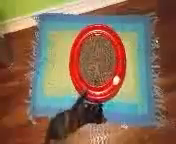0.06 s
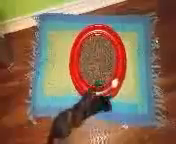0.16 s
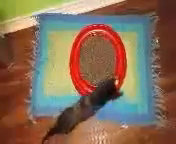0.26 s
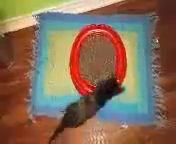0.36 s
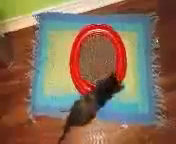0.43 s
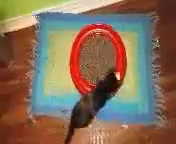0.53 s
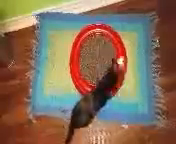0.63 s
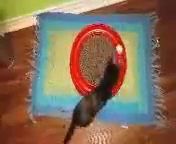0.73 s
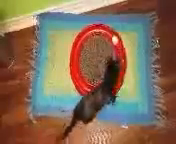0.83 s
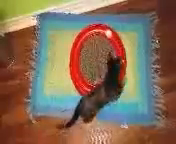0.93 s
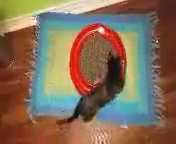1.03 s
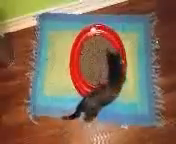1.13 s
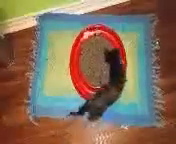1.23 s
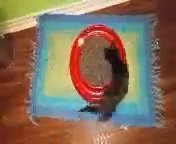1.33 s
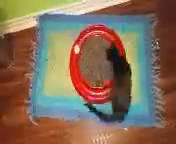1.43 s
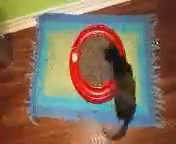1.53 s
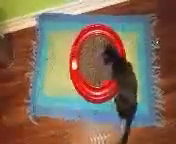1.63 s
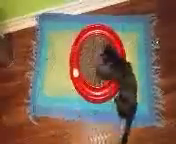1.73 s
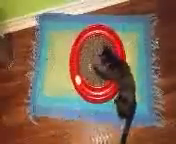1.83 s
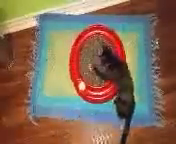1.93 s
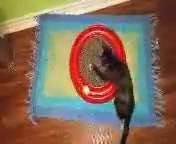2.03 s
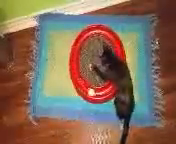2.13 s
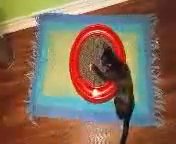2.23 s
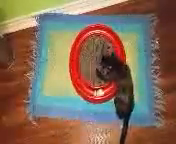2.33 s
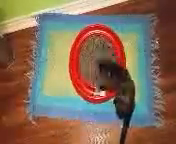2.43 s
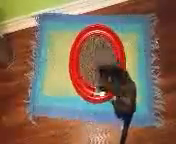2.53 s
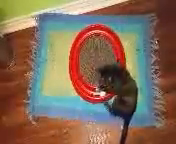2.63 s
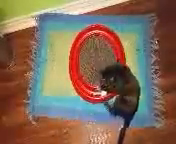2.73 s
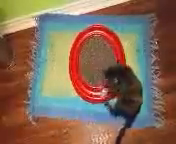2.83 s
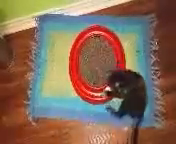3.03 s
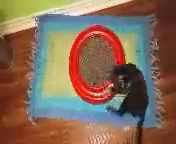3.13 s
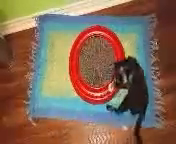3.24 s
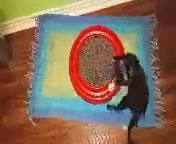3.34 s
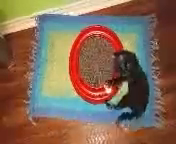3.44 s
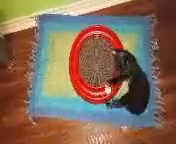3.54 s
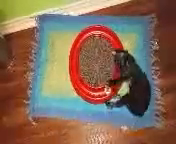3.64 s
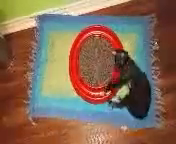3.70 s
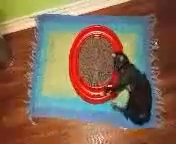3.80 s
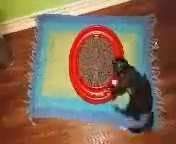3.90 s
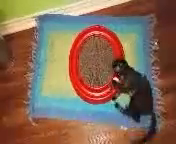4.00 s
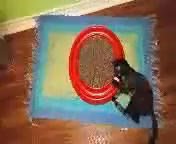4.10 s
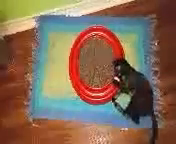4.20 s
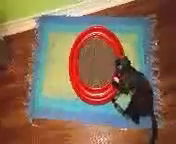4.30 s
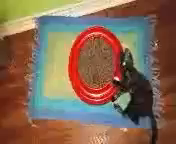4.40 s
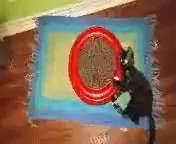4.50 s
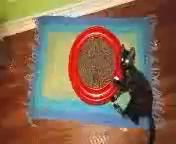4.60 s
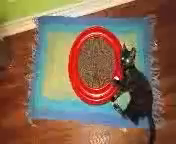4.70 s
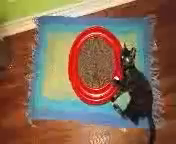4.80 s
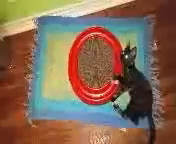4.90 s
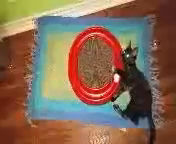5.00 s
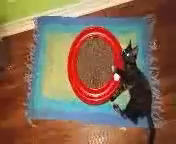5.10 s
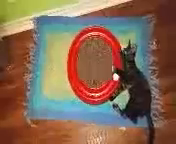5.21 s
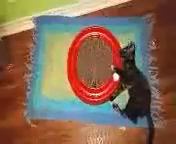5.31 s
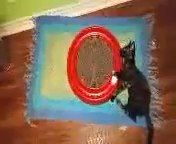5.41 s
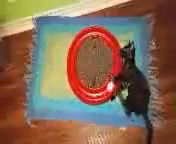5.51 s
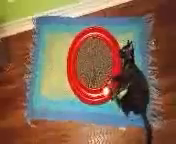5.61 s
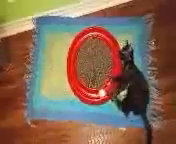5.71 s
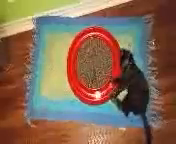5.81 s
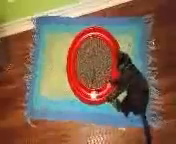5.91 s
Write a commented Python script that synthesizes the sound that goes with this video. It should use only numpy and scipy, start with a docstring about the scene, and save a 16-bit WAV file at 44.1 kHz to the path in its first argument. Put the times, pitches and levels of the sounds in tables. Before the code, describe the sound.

In a quiet room, a cat's paw knocks a hollow plastic track with quick, dull booms, loudest before one second. The ball rolls with a low rattling drone until about 2.5 seconds, amid more blows. Then come isolated thuds, brief rolls and long pauses. A hand-held stereo microphone close by picks up low finger bumps and faint hiss on the left.

```python
"""Cat playing with a ring-track toy

A cat bats a ball round a hollow plastic ring track on a rug, in a quiet room, near a hand-held camera.
Noise-like taps drive decaying track and wall modes: a drone as the ball rolls, a boom at each paw blow.
Low decaying swings give the paw thuds and the finger bumps on the camera; filtered grit gives claw scrapes.
Sparse echoes add the room; a hiss band in the left microphone and a low noise floor lie beneath.
"""
import sys
import numpy as np
from scipy import signal
from scipy.fft import rfft, irfft
from scipy.io import wavfile
from scipy.ndimage import uniform_filter1d

SR = 44100
rng = np.random.default_rng(int(sys.argv[2]) if len(sys.argv) > 2 else 0)


def amp(db):
    return 10 ** (np.asarray(db, float) / 20)


def write(x):
    x = np.atleast_2d(x).T
    wavfile.write(sys.argv[1], SR, np.round(np.clip(x, -1, 1) * 32767).astype(np.int16))


N = 262395
TIME = np.arange(N) / SR


def evened(x):
    """Scales to rms 1."""
    return x / np.sqrt(np.mean(x ** 2) + 1e-30)


def read(points, hz):
    """Interpolates every column of a table on a log-frequency axis."""
    f, *columns = np.transpose(points)
    return [np.interp(np.log(hz + 1), np.log(f + 1), c) for c in columns]


def follow(spans):
    """Soft gate open only within the curves' spans, then every column at every sample."""
    s, *columns = np.transpose(np.concatenate(spans))
    is_open = sum((TIME >= rows[0][0]) & (TIME <= rows[-1][0]) for rows in spans)
    gate = uniform_filter1d(is_open * 1., 600)
    return gate, *[np.interp(TIME, s, c) for c in columns]


def colour(x, points):
    """Filters by a spectrum in dB."""
    count = x.shape[-1]
    gain_db = read(points, np.fft.rfftfreq(count, 1 / SR))[0]
    return irfft(rfft(x) * amp(gain_db), count)


def add(mix, s, sound):
    """Mixes a sound in at a time."""
    part = mix[..., max(round(s * SR), 0):][..., :sound.shape[-1]]
    part += sound[..., :part.shape[-1]]


def ring(modes, weight=1, detune=1):
    """Impulse response of each mode, total energy 1; soft contacts leave little outside the modes' range."""
    hz, db, t60 = np.transpose(modes)[:, :, None]
    t = np.arange(SR // 2) / SR
    decay = amp(db - 60 * t / t60) / np.sqrt(t60)
    out = weight * decay * np.sin(2 * np.pi * hz * detune * t)
    band_hz = [1.178 * hz.min(), 1.12 * hz.max()]
    out = signal.sosfilt(signal.butter(3, band_hz, "band", fs=SR, output="sos"), out)
    return out / np.linalg.norm(out)


def grit(count, per_s, spread_db):
    """Sparse small impacts of random sign, a few of them large; rms 1."""
    chance, size, sign = rng.random(count), rng.exponential(1, count), rng.standard_normal(count)
    return evened((chance < per_s / SR) * np.sign(sign) * amp(spread_db * np.minimum(size, 4)))


def swing(db, hz, t60, rise_s, lead_rad=0):
    """A few low swings that start fast and die without ringing."""
    t = np.arange(SR // 8) / SR
    onset = 1 - np.exp(-(t / rise_s) ** 2)
    return onset * amp(db - 60 * (t / t60) ** 1.325) * np.sin(2 * np.pi * hz * t + lead_rad)


# track ring modes, almost evenly spaced: (frequency [Hz], relative level [dB], t60 [s])
TRACK_MODES = [(115, -20, .08), (145, -17, .09), (175, -7, .16), (460, -13, .1), (493, -11, .15),
               (572, -12, .17), (630, -15, .13), (700, -17, .12), (757, -19, .15), (231, -2, .16),
               (236, -5, .65), (268, -12, .12), (304, -3, .2), (356, 0, .24), (414, -4, .17)]


def favour(favoured_hz):
    """Mode gains: the place of contact drives the track modes near one frequency most."""
    mode_hz = np.transpose(TRACK_MODES)[0][:, None]
    return 0.43 + np.exp(-(np.log(mode_hz / favoured_hz) / 0.3) ** 2)


# wall modes that only hard contacts reach: (frequency [Hz], relative level [dB], t60 [s])
WALL_MODES = [(712, 9, 0.03), (924.4, 3, 0.095), (1086, 2, 0.06), (1178, -16, 0.11), (1394, -2, 0.047),
              (1520, -4, 0.03), (1744, -8, 0.026), (1757, -18, 0.072), (2223, -17, 0.027),
              (2570, -21, 0.022)]


def wall_patch():
    """Impulse response of one stretch of wall; each has its modes at slightly other frequencies."""
    return ring(WALL_MODES, detune=1 + 0.073 * rng.standard_normal((len(WALL_MODES), 1))).sum(0)


# rolling ball, one list a run: (time [s], drone drive level [dB])
ROLL_RUNS = [
    [(0.0, -44), (0.224, -48.5), (0.5, -65)],
    [(0.74, -49), (0.89, -41.5), (1.65, -39), (1.87, -44.5), (2.14, -42.5), (2.42, -45), (2.47, -43),
     (2.58, -56.5), (2.77, -68.5), (3.02, -59)],
    [(3.3, -67), (3.522, -57.5), (3.606, -46), (3.73, -66.5), (3.95, -64), (4.01, -48), (4.11, -51.5),
     (4.15, -70.5)],
    [(5.46, -79), (5.56, -48), (5.686, -47.5), (5.95, -42.5)],
]


def rolling():
    """The ball's unevenness taps the track so often that the taps merge into a rumble; the wall rattles."""
    roll_hz = 328  # modes near here are driven most
    full_rattle_db, full_roll_db, rattle_slope = -66, -36, 0.47  # slope: rattle dB per drone dB
    gate, drone_db = follow(ROLL_RUNS)
    rattle_db = full_rattle_db + rattle_slope * (drone_db - full_roll_db)
    taps = gate * amp(drone_db) * grit(N, 600, 3.5) * favour(roll_hz)
    out = signal.oaconvolve(taps, ring(TRACK_MODES), axes=1).sum(0)[:N]
    ticks = gate * amp(rattle_db) * grit(N, 1500, 1.3)
    patch = (TIME / .09).astype(int) % 8  # the ball passes from one stretch of wall to the next
    for k in range(8):
        out += signal.oaconvolve(ticks * (patch == k), wall_patch())[:N]
    return out


# paw blows: (time [s], boom peak [dB], favoured frequency [Hz], knock peak re boom [dB], rise [s])
PAW_BLOWS = [(0.026, -46.5, 230, -8, 0.0064), (0.212, -38, 414, -22.5, 0.008),
             (.328, -30, 374, -25.5, 0.0049), (.494, -38.5, 383, -27, 0.0059),
             (.535, -26, 370, -27.5, 0.0033), (0.563, -37, 340, -40, 0.0024),
             (0.625, -33, 420, -20, 0.0035), (0.727, -16, 436, -20, 0.0015),
             (.822, -23.5, 345, -23, 0.0036), (.85, -30.5, 362, -30, 0.0055),
             (.909, -33.5, 360, -5, 0.00086), (0.936, -30, 337, -29, 0.0023),
             (1.028, -29.5, 351, -17, 0.00096), (1.13, -29.5, 341, -17.5, 0.0014),
             (1.257, -26, 342, -25, 0.0057), (1.433, -34, 332, -17, 0.0043),
             (1.488, -34, 232, -14.5, 0.00092), (1.642, -28, 333, -14.5, 0.002),
             (1.85, -29, 313, -23.5, 0.0057), (2.03, -23.5, 388, -23, 0.0066),
             (2.053, -32.5, 360, -14, 0.0045), (2.263, -24.5, 342, -21.5, 0.0052),
             (2.477, -24.5, 238, -22, 0.0022), (2.493, -24.5, 250, -26.5, 0.0044),
             (2.529, -29, 223, -26, 0.014), (3.033, -37, 303, -27.5, 0.0047),
             (3.087, -50, 350, -19, 0.0089), (3.283, -39, 369, -31, 0.0016),
             (3.401, -31.5, 400, -21, 0.0017), (3.465, -44, 230, -28, 0.0056),
             (3.562, -31, 335, -25, 0.0024), (3.59, -46, 325, -29, 0.0067),
             (3.618, -23.5, 330, -36.5, 0.0017), (3.928, -28, 362, -19, 0.0017),
             (3.954, -33, 345, -45, 0.0025), (3.994, -34.5, 408, -42, 0.0051),
             (4.447, -51, 400, -19, 0.0066), (5.097, -38, 225, -40, 0.0027),
             (5.124, -31.5, 231, -30, 0.0065), (5.506, -43, 353, -41, 0.0016),
             (5.586, -34, 337, -49, 0.0027), (5.715, -41.5, 684, -9.5, 0.0019),
             (5.845, -35, 390, -43, 0.004)]


def blows():
    """A shudder of ball and track; the quicker the paw lands, the stronger the first contact."""
    shudder_s = 0.023  # decay constant of the chatter
    out, t = np.zeros(N), np.arange(SR // 5) / SR
    for s, boom_db, favoured_hz, hard_db, rise_s in PAW_BLOWS:
        onset = 1 - np.exp(-(t / max(rise_s, 3e-4)) ** 1.8)
        decay = np.exp(-(np.maximum(t - rise_s, 0) / shudder_s) ** 1.19)
        drive = onset * decay * grit(len(t), 900, 3.4)
        drive = drive / np.linalg.norm(drive)
        drive[0] = -1.1 * np.exp(-rise_s / 0.0034)  # first contact
        place = amp(rng.normal(0, 1.5, (len(TRACK_MODES), 1))) * favour(favoured_hz)
        boom = signal.fftconvolve(drive, ring(TRACK_MODES, place).sum(0))
        knock = signal.fftconvolve(drive * np.exp(-t / 0.033), wall_patch())
        blow = boom / abs(boom).max() + amp(hard_db) * knock / abs(knock).max()
        add(out, s, amp(boom_db) * blow)
    return out


# paw weight landing on the toy: (time [s], swing level [dB], frequency [Hz], t60 parameter [s])
PAW_THUDS = [(0.636, -33.5, 178, 0.041), (0.729, -30.5, 140.3, 0.09), (1.021, -39.5, 147, 0.14),
             (2.532, -32.5, 170, 0.14), (3.173, -41.5, 138, 0.085), (3.398, -32.5, 176, 0.075),
             (3.521, -37, 116, 0.052), (3.561, -33, 161, 0.073), (3.619, -14.5, 172, 0.024),
             (3.867, -43.5, 150, 0.075)]


def thuds():
    """The toy and the boards under the rug give one dull beat."""
    out = np.zeros(N)
    for s, db, hz, t60 in PAW_THUDS:
        add(out, s - .002, swing(db, hz, t60, 0.0026))
    return out


def stroke(s, db, hold_s, rise_db_per_s, fall_db_per_s):
    """Pressure that builds, holds and lets go."""
    build_db = abs(rise_db_per_s) * np.maximum(s - TIME, 0)
    release_db = abs(fall_db_per_s) * np.maximum(TIME - s - hold_s, 0)
    return amp(db - build_db - release_db)


# scrape spectrum: (frequency [Hz], relative level [dB])
SCRAPE_SPECTRUM = [(1500, -38), (3000, -17), (5200, -15.5), (7000, -24), (8200, -56), (9500, -20),
                   (11000, -12.5), (12300, 1), (13200, 3), (13700, -59)]
# claw snapping off an edge: (time [s], peak drive level [dB], t60 [s])
SNAP = (.9095, -40.5, 0.045)
# claws and fur on plastic: (full-pressure time [s], drive level [dB], hold [s], rise [dB/s], fall [dB/s])
CLAW_STROKES = [(0.315, -75, .025, 398, 300), (0.632, -74.5, 0.079, 147, 98), (0.743, -59, 0.033, 311, 138),
                (0.916, -40, .001, 2497, 454), (2.444, -69.5, 0.0017, 1103, 545),
                (4.003, -60.5, 0.068, 450, 333), (5.577, -61.5, 0.12, 353, 176)]


def scrape(track):
    """Fine scratches nearer the right port, one claw snap, and a faint fizz whenever the track shakes."""
    right_share = .8
    s, db, t60 = SNAP
    snap = (TIME > s) * amp(db - 60 * abs(TIME - s) / t60)
    claws = sum(stroke(*row) for row in CLAW_STROKES) + snap
    fizz = amp(-65.5) * abs(uniform_filter1d(track ** 2, 2000)) ** 0.19
    fine = np.array([grit(N, 6000, 1.5), grit(N, 6000, 1.5)])
    fine[0] = 0.23 * fine[1] + 0.97 * fine[0]  # ports slightly alike
    sides = 2 * np.array([[1 - right_share], [right_share]])
    drive = claws * sides + fizz * amp([[-1.5], [1.5]])
    return evened(colour(fine, SCRAPE_SPECTRUM)) * drive


# fingers on the camera body: (time [s], left swing level [dB], frequency [Hz], t60 parameter [s])
FINGER_BUMPS = [(1.255, -39, 89, 0.17), (2.159, -12, 107, 0.045), (2.203, -21.5, 99, 0.065),
                (2.225, -15.5, 103, 0.031), (2.511, -27.5, 87, 0.064), (4.8, -19.5, 102, 0.055),
                (5.316, -12, 105, 0.018), (5.348, -36, 100, 0.059), (5.928, -13, 99, 0.069)]


def bumps():
    """Low swings of the camera body, strong in the left port, weaker and out of step in the right."""
    right_re_left_db = -10.5
    out = np.zeros((2, N))
    for s, db, hz, t60 in FINGER_BUMPS:
        left = -swing(db, hz, t60, .0025)
        right = swing(db + right_re_left_db, hz, t60, 0.0021, -1.1)
        add(out, s, np.array([left, right]))
    return out


# echo decay: (frequency [Hz], t60 [s])
ECHO_DECAY = [(100, 0.16), (300, 0.17), (1000, 0.29), (4000, 0.92), (12000, 0.2)]


def room(x):
    """Sparse echoes of random sign, different in each port, each band dying at its own speed."""
    taps = np.zeros((2, SR // 2))
    at = np.arange(200, SR // 2 - 20, 20) + rng.integers(0, 20, (2, (SR // 2 - 201) // 20))
    np.put_along_axis(taps, at, rng.choice([-1., 1.], at.shape), 1)
    hz, t, z = signal.stft(taps, SR, nperseg=512)
    t60 = read(ECHO_DECAY, hz)[0][:, None]
    tail = signal.istft(z * amp(-60 * t / t60), SR, nperseg=512)[1]
    return signal.fftconvolve(x, tail / np.linalg.norm(tail[0]), axes=1)[:, :N]


# hiss spectrum: (frequency [Hz], relative level [dB])
HISS_SPECTRUM = [(2300, -57), (2700, -19.5), (3200, -9), (3800, 1.5), (4400, 3), (5200, -2), (6000, -15),
                 (7000, -24.5), (7600, -74)]


def hiss():
    """A smooth band of noise in the left microphone only."""
    rms_db = -48
    left = amp(rms_db) * evened(colour(rng.standard_normal(N), HISS_SPECTRUM))
    return np.array([left, np.zeros(N)])


# room and microphone floor: (frequency [Hz], left [dB per Hz], right [dB per Hz], likeness [0 to 1])
FLOOR_SPECTRUM = [(15, -86, -94, 0.4), (44, -73, -80.5, 0.096), (74, -81.5, -78.5, 0.38),
                  (143.7, -81, -90, 0.17), (252, -88.5, -86, 0.048), (481, -91.5, -96.5, 0.83),
                  (790, -107, -109, 0.82), (1400, -114, -115, 0.68), (2600, -118, -118, 0.37),
                  (3840, -112, -110, 0), (5740, -117, -117, 0), (6900, -130, -130, 0.13),
                  (9050, -135, -133, 0.31), (12400, -126, -126, 0), (13400, -130, -130, 0),
                  (13800, -170, -170, 0.16)]


def floor():
    """Low rumble and faint microphone noise, loosely alike in both ports."""
    left_db, right_db, same = read(FLOOR_SPECTRUM, np.fft.rfftfreq(N, 1 / SR))
    a, b = rfft(rng.standard_normal((2, N))) * np.sqrt(SR / 2)  # unit power per Hz
    same = np.clip(same, 0, 1)
    right = same * a + np.sqrt(1 - same ** 2) * b
    return irfft([a * amp(left_db), right * amp(right_db)], N)


def scene():
    """Toy near the middle, with its room; camera noises dry."""
    track = rolling() + blows() + thuds()
    low = signal.sosfilt(signal.butter(2, 1200, fs=SR, output="sos"), track)
    treble = track - low  # short waves scatter more
    claws = scrape(track)
    wet = amp(-19) * track + amp(-1.5) * treble + amp(-10) * claws
    return track * amp([[-.4], [.4]]) + claws + room(wet) + bumps() + hiss() + floor()


def low_pass(x):
    """Removes everything above the highest recorded frequency."""
    return signal.sosfilt(signal.butter(12, 13890, fs=SR, output="sos"), x)


def record(dry):
    """An expander turns quiet passages down a little; a low-pass then limits the band."""
    threshold_db, slope, most_cut_db, memory_s, edge_hz = -41.5, 0.47, -5.5, .07, 13000
    sensed = signal.sosfilt(signal.butter(2, 200, "high", fs=SR, output="sos"), dry)  # deaf to deep bumps
    memory = np.exp(-1 / (memory_s * SR))
    power = signal.lfilter([1 - memory], [1, -memory], (sensed ** 2).mean(0), zi=[1e-4])[0]
    power_db = 10 * np.log10(power + 1e-12)
    expanded = dry * amp(np.clip(slope * (power_db - threshold_db), most_cut_db, 0))
    edge = signal.firwin(511, edge_hz, window=("kaiser", 9), fs=SR)
    return low_pass(signal.oaconvolve(expanded, edge[None], "same"))


dry = scene()
out = record(dry)
write(out)
```